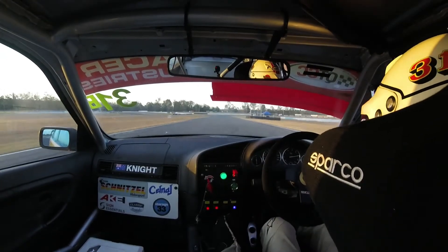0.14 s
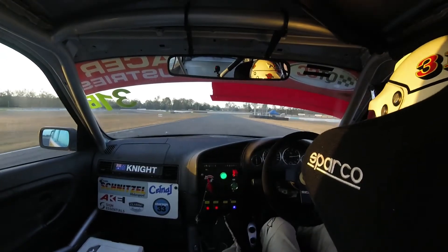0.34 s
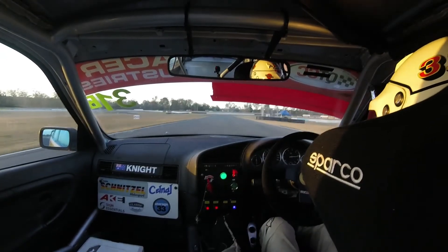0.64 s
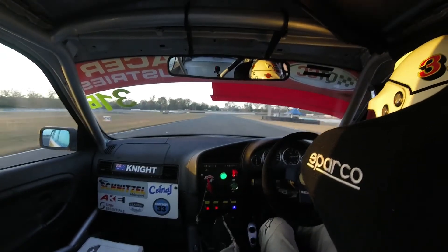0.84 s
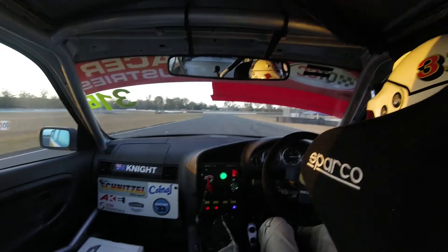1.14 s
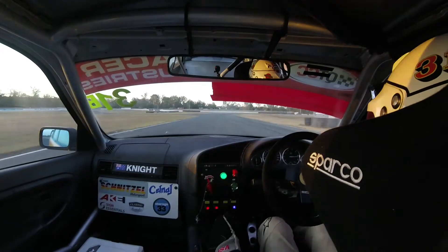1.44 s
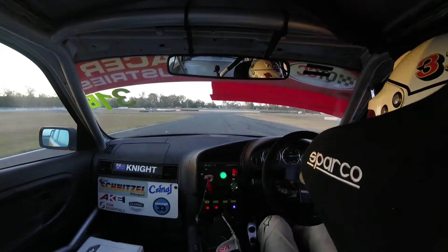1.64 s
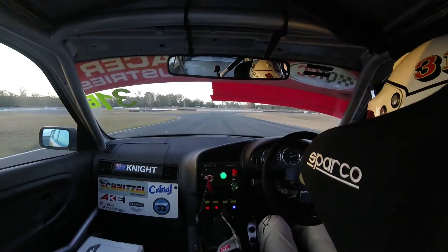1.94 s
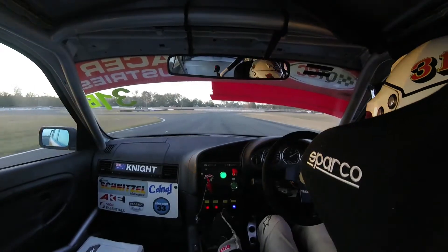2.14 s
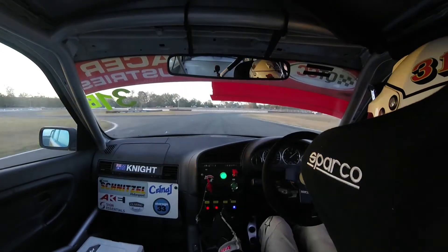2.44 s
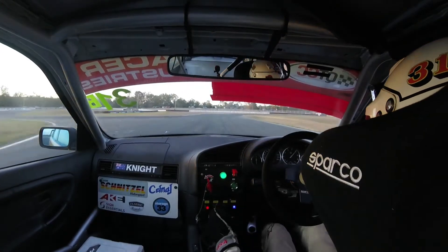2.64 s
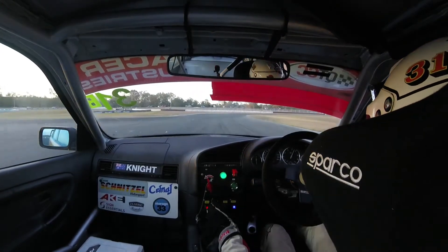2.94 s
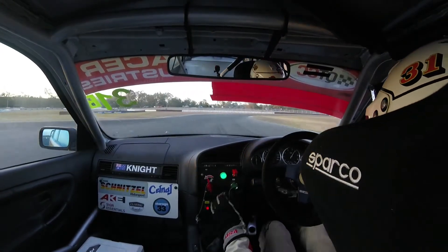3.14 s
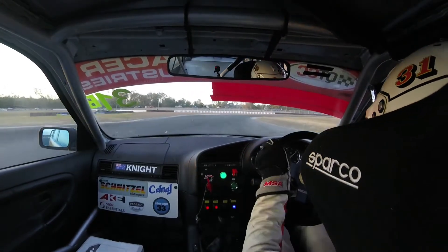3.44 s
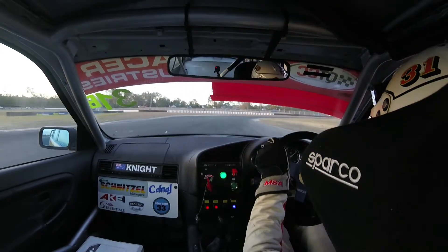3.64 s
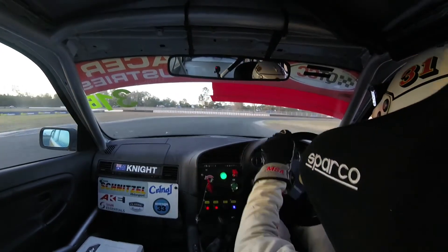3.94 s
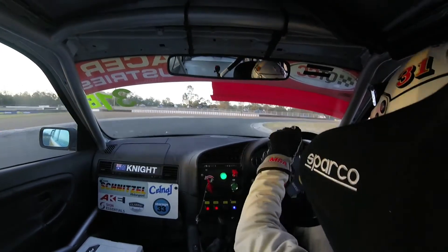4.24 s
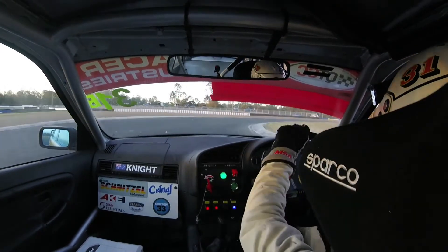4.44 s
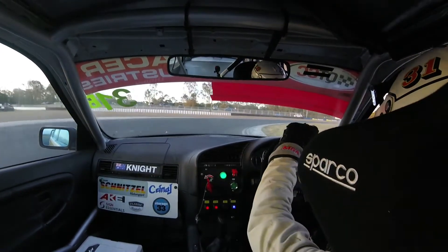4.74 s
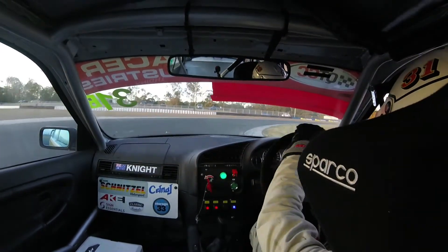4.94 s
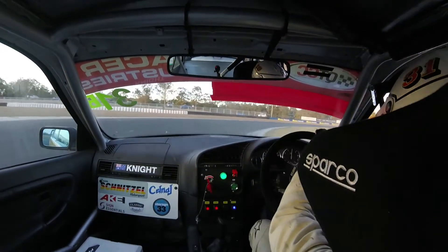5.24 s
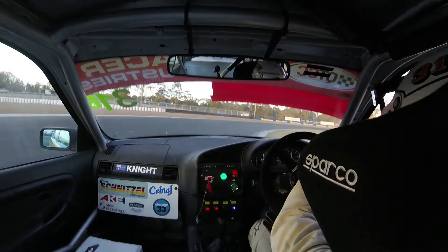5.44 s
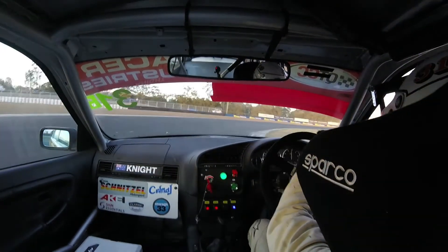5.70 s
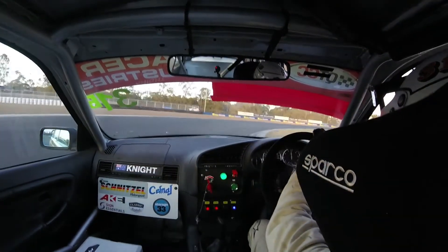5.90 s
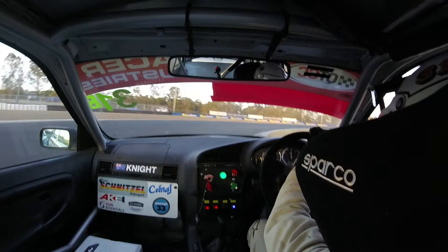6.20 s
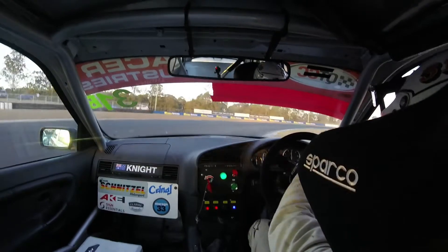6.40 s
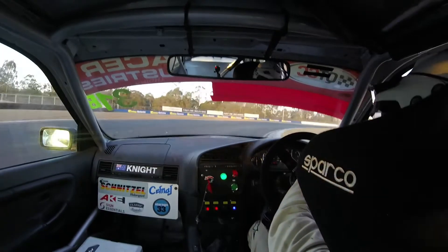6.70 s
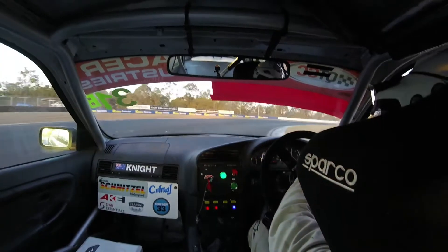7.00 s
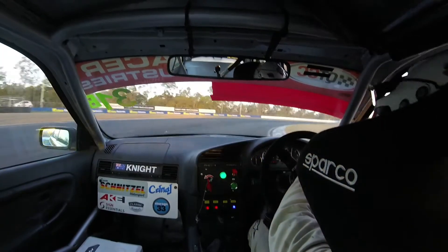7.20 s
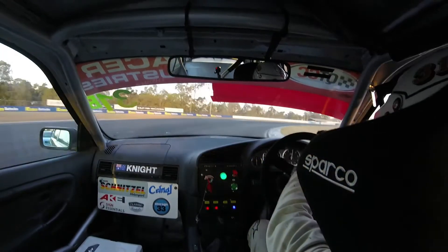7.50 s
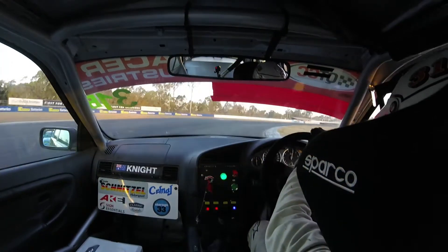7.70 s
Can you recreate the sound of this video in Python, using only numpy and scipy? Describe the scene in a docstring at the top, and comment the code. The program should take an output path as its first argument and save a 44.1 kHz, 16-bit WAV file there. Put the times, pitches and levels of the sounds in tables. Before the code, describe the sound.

One microphone close to the bare panels of a racing cabin picks up a hard-revving six-cylinder engine and heavy road rumble. The throttle shuts and the pitch falls, with high brake squeals and jolting rattles. A quick blip marks a downshift, and the tyres chirp lightly as the car keeps slowing. After a split-second dropout, the engine accelerates again.

```python
"""One microphone inside a stripped racing saloon, close to the bare panels, road noise booming in the cabin.
A straight six pulls at full throttle, its tones swelling in the cabin modes, then the driver lifts.
Hard braking follows: the discs squeal thinly, jolted loose parts rattle, the intake roars for a downshift.
Tyres chirp through a long corner; at 6 s the sound drops out for a tenth of a second,
then the throttle opens again and the revs climb."""
import sys
import numpy as np
from scipy import signal
from scipy.fft import rfft, irfft, next_fast_len
from scipy.io import wavfile
from scipy.ndimage import uniform_filter1d

SR = 44100
rng = np.random.default_rng(int(sys.argv[2]) if len(sys.argv) > 2 else 0)


def generate_wav(sig):
    """Save sig (samples, or channels by samples) to the path in sys.argv[1] as 16-bit PCM at SR."""
    pcm = np.round(np.clip(np.atleast_2d(sig).T, -1, 1) * 32767).astype(np.int16)
    wavfile.write(sys.argv[1], SR, pcm)


N = 346626
TIME_S = np.arange(N) / SR

# engine speed, hunting as the tyres bite; a cycle is two crank turns: time_s, cycle_hz
ENGINE_SPEED = [(0, 50.37), (0.45, 51.25), (1.2, 52.41), (1.45, 51.95), (1.72, 49.7), (1.94, 47.2),
                (2.15, 44), (2.5, 41.3), (2.72, 39.2), (2.96, 39.3), (3.12, 44.4), (3.33, 43.8),
                (3.48, 44.3), (3.66, 43.1), (3.75, 41.8), (4.1, 38.4), (4.5, 35.76), (5.1, 31.86),
                (5.9, 29.8), (6.17, 31.5), (6.31, 30.5), (6.43, 30.9), (6.5, 32.4), (6.58, 32.1),
                (6.68, 30.9), (6.8, 31.85), (6.95, 31.9), (7.03, 32.55), (7.16, 32.7), (7.23, 33.5),
                (7.36, 33.55), (7.43, 34.25), (7.55, 34.35), (7.64, 34.85), (7.78, 35.1), (7.86, 35.25)]


def from_db(db):
    """Decibels to gain."""
    return 10 ** (np.asarray(db) / 20)


def rms_one(x):
    """Scale to rms 1."""
    return x / np.sqrt(np.mean(x ** 2) + 1e-20)


def in_time(rows):
    """The columns after time_s, one value per sample."""
    time_s, *columns = np.transpose(rows)
    return [np.interp(TIME_S, time_s, column) for column in columns]


def drift(rate_hz):
    """Slow random wander of spread 1: noise at every 40th sample through a double one-pole low-pass."""
    pole = np.exp(-80 * np.pi * rate_hz / SR)
    slow = signal.lfilter([1], [1, -2 * pole, pole * pole], rng.standard_normal(N // 40 + 2002))[2000:]
    return np.interp(np.arange(N) / 40, np.arange(len(slow)), rms_one(slow))


def resonate(x, hz, width_hz):
    """One resonance, gain 1 at its top."""
    radius = np.exp(-np.pi * width_hz / SR)
    feedback = [1, -2 * radius * np.cos(2 * np.pi * hz / SR), radius ** 2]
    return signal.lfilter(np.array([1, 0, -1]) * (1 - radius ** 2) / 2, feedback, x)


def body(x, modes):
    """Resonances in parallel, signs alternating."""
    return sum((-1) ** k * from_db(db) * resonate(x, hz, width) for k, (hz, width, db) in enumerate(modes))


def steadied(x, share):
    """Takes out a share of the chance swelling of a narrow noise; rms 1."""
    power = uniform_filter1d(rms_one(x) ** 2, size=2400)
    return rms_one(x / (power + 0.26) ** (share / 2))


def coloured_noise(spectrum):
    """White noise shaped to an outline of frequency_hz, density_db; rms 1."""
    size = next_fast_len(N)
    hz, density_db = np.transpose(spectrum)
    grid_hz = np.arange(1, size // 2 + 2) * SR / size
    shape = from_db(np.interp(np.log(grid_hz), np.log(hz), density_db, left=-90, right=-90))
    return rms_one(irfft(rfft(rng.standard_normal(size)) * shape, size)[:N])


def glides(rows):
    """Flickering gliding tones, faded in and out."""
    tones = 0
    for start, stop, start_hz, end_hz, db in rows:
        fade = np.clip(np.minimum(TIME_S - start, stop - TIME_S) / 0.03, 0, 1)
        phase = 2 * np.pi * np.cumsum(np.interp(TIME_S, (start, stop), (start_hz, end_hz))) / SR
        tones += fade * from_db(db + 2.5 * drift(21)) * np.sin(phase + 0.6 * drift(30))
    return np.sqrt(2) * tones


def dip_gain():
    """The booming and the engine tones dip briefly."""
    dips = [(1.35, 0.018, -26), (1.541, 0.014, -8), (1.754, 0.013, -9), (1.898, 0.017, -22),
            (2.856, 0.091, -7.5), (4.105, 0.035, -8), (4.393, 0.03, -12), (5.014, 0.02, -10)]   # centre_s, half_length_s, depth_db
    return from_db(sum(db * np.exp(-((TIME_S - centre) / half) ** 2) for centre, half, db in dips))


def road():
    """Tyre and wind noise; the road feeds only lows into the shell, bumps shake roar and hiss together."""
    levels = [(0, -31.5, -29.5, -39), (1.2, -34, -35.5, -42), (1.3, -26.5, -30, -46),
              (1.9, -46, -32.5, -45), (2.3, -44, -32.5, -43.5), (2.7, -14, -34, -42),
              (3.1, -32, -29.5, -44.5), (3.5, -17.5, -28.5, -42.5), (4, -18, -32, -46.5),
              (4.3, -23, -30.5, -47), (5, -19, -30, -44.5), (5.7, -13, -30.5, -49.5),
              (6, -15.5, -30.5, -43), (6.2, -12.5, -34, -45), (6.45, -15.5, -35, -43),
              (6.8, -20, -35.5, -42), (7.5, -21.5, -35.5, -37.5), (7.86, -18, -29.5, -34.5)]   # time_s, thrum_db, roar_db, hiss_db
    boom_levels = [(0, -14.5, -35, -34), (1.2, -21, -31, -38.5), (1.6, -30.5, -23.5, -45.5),
                   (1.8, -37, -24.5, -39), (1.96, -21, -18.5, -42), (2.1, -19.5, -28.5, -42),
                   (2.3, -22.5, -24.5, -37), (2.52, -29, -22.5, -38), (2.68, -9, -15, -38),
                   (2.9, -17.5, -25.5, -25), (3.1, -14, -24.5, -38.5), (3.4, -24, -36, -32),
                   (3.7, -17, -22, -44), (4.0, -21.5, -18.5, -44), (4.3, -16.5, -32, -32),
                   (4.9, -19.5, -34.5, -32), (5.08, -19.5, -15.5, -38.5), (5.3, -25, -23.5, -27),
                   (5.55, -11, -15, -50), (5.72, -24.5, -19, -48), (5.83, -9, -20.5, -45),
                   (5.95, -15.5, -26, -46), (6.18, -32, -23, -46), (6.26, -33, -14, -49),
                   (6.33, -27, -22, -42), (6.4, -24.5, -23.5, -46), (7, -20.5, -19.5, -45.5),
                   (7.86, -26.5, -28, -37)]   # time_s, lower_modes_db, upper_mode_db, panel_mode_db
    # resonances: pitch_hz, width_hz, level_db
    floor_modes = [(36, 14, 1.5), (53.5, 10.4, 2)]
    lower_air_modes = [(156, 7, 5.5), (114, 25, -17.5)]
    # noise outlines: frequency_hz, density_db
    rumble_spectrum = [(8.8, -32), (15, 3), (43, 1.5), (76, -1.5), (113, 0.5), (146, -14), (194, 1.5),
                       (227, -19.5), (301, -30), (330, -25.5), (430, -36), (730, -120)]
    roar_spectrum = [(140, -13.5), (230, -2), (301, -4), (409, -15), (486, -6), (668, -14), (746, -9),
                     (843, -13.5), (953, -12.5), (1520, -16), (4300, -39.5), (5590, -77.5), (9460, -120)]
    hiss_spectrum = [(2290, -51), (3900, -28), (4290, -52), (4800, -5), (5260, -3.5), (5860, 7.5),
                     (6450, 13), (9180, -18.5), (11500, -39), (15000, -59), (22000, -120)]   # the microphone housing rings near 6.4 kHz
    thrum_db, roar_db, hiss_db = in_time(levels)
    lower_db, upper_db, panel_db = in_time(boom_levels)
    bumps = drift(6.9)
    shaking = signal.sosfilt(signal.butter(2, 450, fs=SR, output="sos"), rng.standard_normal((4, N)))
    thrum = from_db(thrum_db + 1.4 * drift(5.2)) * steadied(body(shaking[0], floor_modes), share=0.32)
    rumble = from_db(roar_db + 10 + 0.88 * drift(30)) * coloured_noise(rumble_spectrum)
    boom = from_db(lower_db) * steadied(body(shaking[1], lower_air_modes), share=0.4)
    boom += from_db(upper_db) * steadied(resonate(shaking[2], hz=195, width_hz=12), share=0.6)
    boom += from_db(panel_db) * rms_one(resonate(shaking[3], hz=302, width_hz=3.7))
    roar = from_db(roar_db + 1.4 * bumps + 1.5 * drift(34)) * coloured_noise(roar_spectrum)
    hiss = from_db(hiss_db + bumps + 1.1 * drift(42)) * coloured_noise(hiss_spectrum)
    return thrum + rumble + dip_gain() * boom + roar + hiss


def driveline():
    """The propshaft hums lower as the car slows; a second hum swells around the upper cabin mode."""
    # gliding hums: time_s, pitch_hz, level_db
    cabin_hum = [(3.42, 189.7, -27), (3.488, 200.3, -15.5), (3.616, 192.3, -9), (3.798, 189.5, -8.5),
                 (3.902, 195.2, -21), (3.98, 203, -19)]
    propshaft = [(0, 416, -34.5), (0.6, 428, -42), (1.2, 432, -42.5), (1.45, 427, -44.5), (1.9, 390, -44),
                 (2.1, 374.3, -37.5), (2.5, 345, -35.5), (2.8, 316, -34), (3.15, 300.2, -28.5),
                 (3.45, 286, -32)]
    hums = 0
    for rows, waver_db in ((cabin_hum, 0.6), (propshaft, 3.5)):
        hz, level_db = in_time(rows)
        fade = np.clip(np.minimum(TIME_S - rows[0][0], rows[-1][0] - TIME_S) / 0.12, 0, 1)
        hums += fade * from_db(level_db + waver_db * drift(21)) * np.sin(2 * np.pi * np.cumsum(hz) / SR)
    return np.sqrt(2) * hums


def tyre_chirps():
    """The tyres scrub and chirp in the corner, heard from inside."""
    chirps = [(5.11, 5.19, 1130, 1060, -43), (5.19, 5.26, 900, 1010, -45), (5.28, 5.35, 1240, 1270, -44),
              (5.41, 5.5, 1340, 1260, -46), (5.52, 5.6, 750, 790, -41), (5.62, 5.7, 1150, 1180, -45),
              (5.71, 5.78, 1140, 1170, -45), (5.78, 5.9, 760, 730, -45), (5.93, 6.02, 1190, 1170, -45)]   # start_s, stop_s, start_hz, end_hz, level_db
    return glides(chirps)


def rattles():
    """Loose parts in the cabin: each jolt is a dying swarm of clicks that rings the same modes."""
    jolts = [(1.694, -28, 0.18, 7, -7), (2.084, -12.5, 0.1, -2.5, 3), (2.129, -33.5, 0.19, 7.5, -9),
             (2.957, -32.5, 0.35, -10, -9), (3.06, -36, 0.17, -14, -11), (4.132, -31.5, 0.35, 8, -3),
             (4.32, -32.5, 0.18, -2, -15), (4.42, -41, 0.16, -3, -8), (4.507, -33.5, 0.1, -14, -6),
             (4.579, -36, 0.13, 4, -8)]   # start_s, level_db, t60_s, low_share_db, bracket_share_db
    pitches = (800, 1450, 2050, 2250, 2880, 3400, 4700, 5600, 6080, 6480, 7700, 9500)   # modes of the parts: pitch_hz
    modes = [(450, 4), (600, -8.5), (22, 14), (900, -3), (110.2, 5), (900, -13), (900, -10), (300, 5),
             (312, 9.5), (294, 12.5), (1200, -3.5), (1500, -10)]   # for each pitch: width_hz, level_db
    bracket_pitches = (2050, 2880)   # the modes that belong to a metal bracket: pitch_hz
    clicks = rng.standard_normal(N) * (rng.random(N) < 0.35)
    highs, lows, bracket, ringing = np.zeros((4, N))
    for start, level_db, t60, low_db, bracket_db in jolts:
        age = np.maximum(TIME_S - start, 0)
        envelope = from_db(level_db + 9 - 60 * age / t60) * (1 - np.exp(-age / 0.004))
        highs += envelope
        lows += envelope * from_db(low_db)
        bracket += envelope * from_db(low_db + bracket_db)
    for k, (hz, (width_hz, db)) in enumerate(zip(pitches, modes)):
        force = bracket if hz in bracket_pitches else lows if hz < 5000 else highs
        ringing += (-1) ** k * from_db(db) * resonate(force * clicks + 1e-18, hz, width_hz)
    return ringing


def thin_squeals():
    """Lone faint squeals that sag in pitch."""
    squeals = [(1.76, 2.2, 7090, 7080, -54), (3.73, 4.15, 7330, 7220, -52), (5.02, 5.3, 5575, 5460, -56)]   # start_s, stop_s, start_hz, end_hz, level_db
    return glides(squeals)


def brakes():
    """Pad friction hisses and rings narrow disc modes, each wavering on its own and sagging in pitch."""
    presses = [(1.957, 2.745, -37, -2), (2.963, 3.046, -31, -5), (3.17, 3.47, -55, -4),
               (3.716, 4.139, -46, -1.5)]   # start_s, stop_s, level_db, ring_share_db
    pitches = (7095, 7385, 7620, 7895, 6800)   # disc modes as the pedal goes down: pitch_hz
    disc_modes = [(10, -8), (40, -5), (25, -20), (30, -12.5), (15, -20)]   # for each pitch: width_hz, level_db
    sag_per_s = (0.001, 0.009, 0.004, 0.011, 0.002)   # share of each pitch lost while held
    rise_s, swell_db_per_s, fall_db_per_s = 0.027, 4, 142.5
    pad_hz, pad_width_hz, pad_db = 7200, 790, -9
    friction, ring, held_s = 0, 0, 0
    for start, stop, db, ring_db in presses:
        age = np.clip(TIME_S - start, 0, stop - start)
        level_db = db + swell_db_per_s * age - fall_db_per_s * np.maximum(TIME_S - stop, 0)
        pressure = np.clip((TIME_S - start) / rise_s, 0, 1) * from_db(level_db)
        friction += pressure
        ring += pressure * from_db(ring_db)
        held_s = np.where(TIME_S > start, age, held_s)
    pad_noise = resonate(resonate(rng.standard_normal(N), pad_hz, pad_width_hz), pad_hz, pad_width_hz)
    sound = friction * from_db(pad_db) * rms_one(pad_noise)
    for hz, sag, (width_hz, db) in zip(pitches, sag_per_s, disc_modes):
        phase = 2 * np.pi * np.cumsum(hz * (1 - sag * held_s)) / SR
        gain = ring * from_db(db + 2.7 * drift(3.4))
        sound += gain * (drift(width_hz) * np.cos(phase) + drift(width_hz) * np.sin(phase))
    return sound


def intake_blips():
    """The intake roars as the throttle snaps open for a moment, throbbing once per crank turn."""
    stabs = [(2.942, 3.102, -31), (5.11, 5.36, -33.5), (5.55, 5.61, -35)]   # the first is for the downshift: start_s, stop_s, level_db
    intake_modes = [(574, 195, 1.5), (1040, 630, -3.5), (1416, 250, 0)]   # pitch_hz, width_hz, level_db
    rise_s, fall_s = 0.02, 0.067
    envelope = 0
    for start, stop, db in stabs:
        rise = np.clip((TIME_S - start) / rise_s, 0, 1)
        envelope += from_db(db) * rise * np.exp(-np.maximum(TIME_S - stop, 0) / fall_s)
    cycle_hz, = in_time(ENGINE_SPEED)
    throb = 1 + 0.14 * np.cos(4 * np.pi * np.cumsum(cycle_hz) / SR)
    return envelope * throb * from_db(2 * drift(45)) * rms_one(body(rng.standard_normal(N), intake_modes))


def engine():
    """Multiples of the cycle rate swell as they cross cabin modes; drives whine and valves clatter."""
    throttle = [(0, 1, -0.5, 2, -1), (0.55, 0.93, 1, 0.5, 2), (0.66, 0.96, 0, 3, -7.5), (0.8, 1, 0, 1, 2.5),
                (1.24, 0.9, 1, 1, -1), (1.29, 0, -2, 1.5, -16), (1.45, 0.28, -5, 0, -10),
                (1.7, 0.39, 1.5, -0.5, -6), (1.95, 0.64, -4, 3, -11), (2.1, 0.47, -7, -6, 1),
                (2.9, 0.63, 1.5, 4, -4), (2.97, 0.93, 3, 1.5, -11), (3.15, 0.75, -4.5, 2, -4),
                (3.7, 0.5, 5, 4.5, 1), (4.1, 0.28, 0.5, 2.5, -10), (4.9, 0.29, -9.5, 0.5, -19),
                (5.9, 0.14, -2, 2.5, -14), (6.2, 0.7, -1.5, 1.5, -3), (6.52, 0.57, 2.5, -2, 2),
                (6.68, 0.64, 0.5, 2.5, -3), (6.85, 0.71, -0.5, 1.5, 2.5), (7.1, 0.75, 3, -3.5, 6),
                (7.27, 0.89, 0, 1, -1.5), (7.5, 0.98, -0.5, -7.5, -4), (7.86, 1.06, 3.6, -1, 1)]   # time_s, opening (0 shut, 1 full), above_firing_db, up_to_firing_db, whine_db
    orders = [(3, -11, -24.5, -3), (4, -11.5, -24, -9.5), (5, -17.5, -29, -28), (6, -19.5, -6, -10),
              (7, -12.5, -25, -23.5), (8, -24.5, -21.5, -22.5), (9, -23, -30, -12.5), (10, -19, -27, -11.5),
              (11, -27.5, -32, -22.5), (12, -21.5, -13.5, -16), (13, -41.5, -27, -11),
              (14, -24, -24.5, -21.5), (15, -33.5, -19.5, -20), (16, -38, -18, -26), (17, -29, -27, -32),
              (18, -30, -18.5, -22), (19, -33.5, -32, -23), (20, -35, -28, -27), (21, -35, -14, -14),
              (22, -28, -28, -18.5), (23, -33.5, -34, -17), (24, -32, -10, -14), (25, -31.5, -32.5, -22.5),
              (27, -32.5, -15, -33), (30, -33, -17.5, -23), (33, -35, -18, -21), (36, -36.5, -22, -31),
              (39, -35, -14, -21.5), (42, -33.5, -27, -26), (48, -37, -28, -31.5), (45, -37, -23.5, -33.5)]   # multiple, shut_db, open_low_revs_db, open_high_revs_db
    low_high_revs = (33, 51.5)   # low_cycle_hz, high_cycle_hz
    cabin_response = [(85, -9), (120, -14.5), (130, -9), (140, -19.5), (150, -6.5), (156, -1), (163, -1.5),
                      (173, -26), (183, -6.5), (192, 2.5), (201, -3), (206, -9.5), (225, -17), (240, -16.5),
                      (262, -14.5), (290, -26), (301, -14), (308, -13.5), (316, -20), (335, -22),
                      (370, -16), (400, -26), (454, -26.5), (462, -16.5), (474, -17.5), (530, -24.5),
                      (600, -13), (670, -29), (740, -21.5), (790, -27), (840, -25.5), (880, -25.5),
                      (930, -20.5), (1150, -33.5), (1290, -26.5), (1350, -27), (1550, -24.5), (1900, -31),
                      (2200, -26)]   # air and panel modes at the microphone: frequency_hz, gain_db
    whine_multiples = (50.8, 58)   # toothed drives: multiple of the cycle rate
    whine_levels = [(-16, -19), (-9.5, -15.5)]   # for each drive, relative to the load: low_revs_db, high_revs_db
    clatter_spectrum = [(300, -11), (700, -5), (1500, -10), (3000, -19.5), (4300, -31.5), (6400, -15),
                        (8500, -21.5), (11000, -35.5), (12000, -53), (14500, -62)]   # valve gear: frequency_hz, density_db
    firing_multiple = 6
    cycle_hz, = in_time(ENGINE_SPEED)
    opening, upper_db, lower_db, whine_db = in_time(throttle)
    load_db = -49.5 + 15 * opening   # mechanical noise grows with the throttle
    burble_db = np.interp(opening, (0, 1), (3, 1.2))   # uneven combustion makes the tones waver
    fuel_cut_db = np.where(cycle_hz > 35, -9, 0)   # coasting at high revs weakens the firing tones
    phase = 2 * np.pi * np.cumsum(cycle_hz) / SR
    # the crank does not turn quite evenly
    uneven_phase = phase + np.interp(cycle_hz, low_high_revs, (0.022, 0.012)) * drift(5.2)
    tones = 0
    for multiple, shut_db, *open_db in orders:
        coast_db = shut_db + (multiple > 4) * fuel_cut_db
        source_db = coast_db + (np.interp(cycle_hz, low_high_revs, open_db) - coast_db) * opening
        source_db += upper_db if multiple > firing_multiple else lower_db
        cabin_db = np.interp(multiple * cycle_hz, *np.transpose(cabin_response))
        waver_db = (2.4 if multiple > 2 * firing_multiple else 1) * burble_db * drift(7.3)
        tone = np.sin(multiple * uneven_phase + rng.uniform(0, 2 * np.pi))
        tones += from_db(source_db + cabin_db + waver_db) * tone
    for multiple, by_revs_db in zip(whine_multiples, whine_levels):
        level_db = load_db + np.interp(cycle_hz, low_high_revs, by_revs_db) + whine_db + 2 * drift(12)
        tones += from_db(level_db) * np.sin(multiple * uneven_phase + 0.5 * drift(6.2))
    # some valves are louder than others
    valve_beat = 1 + 0.18 * np.cos(phase) + 0.045 * np.cos(2 * phase + 1) + 0.085 * np.cos(3 * phase)
    clatter = from_db(load_db) * valve_beat * coloured_noise(clatter_spectrum)
    return np.sqrt(2) * dip_gain() * tones + clatter


def scene():
    """Everything that reaches one microphone in the cabin."""
    car = engine() + intake_blips() + driveline() + road()
    return (car + brakes() + thin_squeals() + tyre_chirps() + rattles())[None]


def record(dry):
    """Peaks are rounded, the sound drops out briefly and fades back, the top is cut."""
    silent_s, return_s, fade_in_s = 6.04, 6.133, 0.027
    fade_out = np.clip((silent_s - TIME_S) / 0.0077, 0, 1)
    fade_in = np.clip((TIME_S - return_s) / fade_in_s, 0, 1) ** 2
    top_cut = signal.cheby2(12, 70, 12800, fs=SR, output="sos")
    return signal.sosfilt(top_cut, (fade_out + fade_in) * np.tanh(dry / 1.425))


dry = scene()
out = record(dry)
generate_wav(out)
```